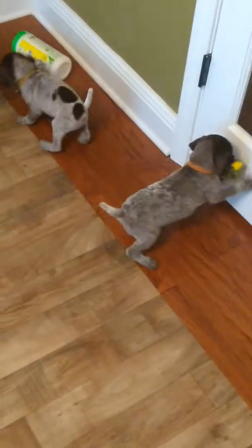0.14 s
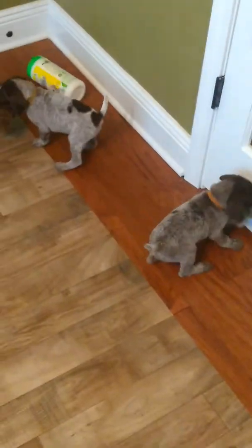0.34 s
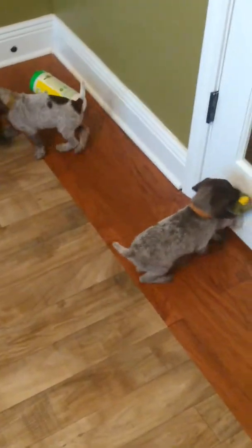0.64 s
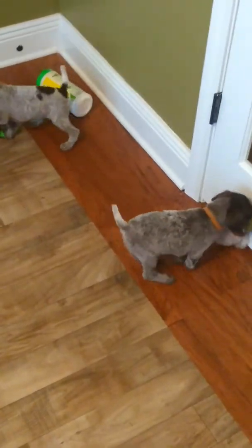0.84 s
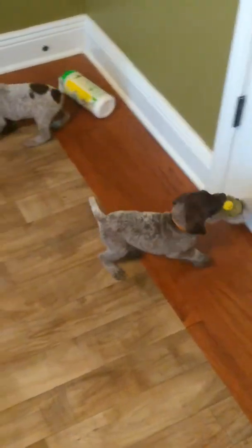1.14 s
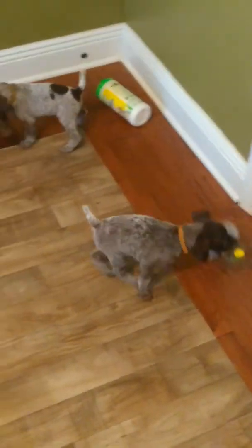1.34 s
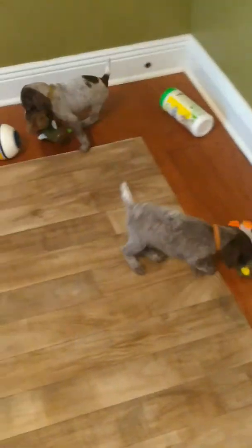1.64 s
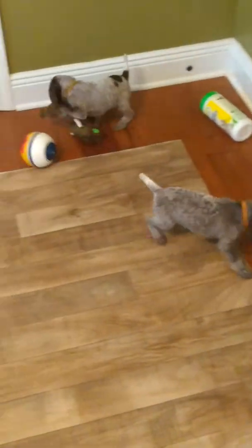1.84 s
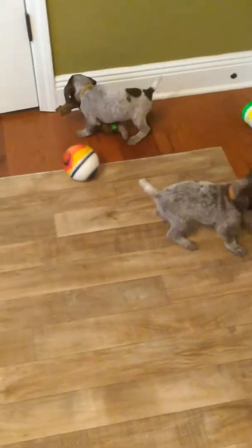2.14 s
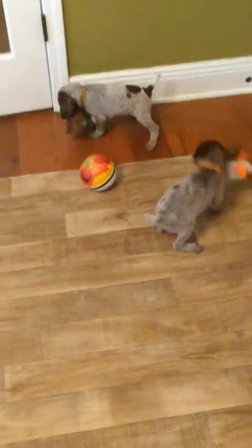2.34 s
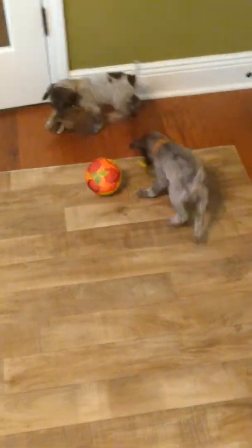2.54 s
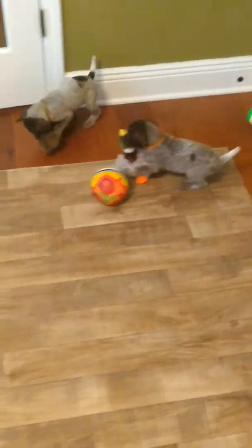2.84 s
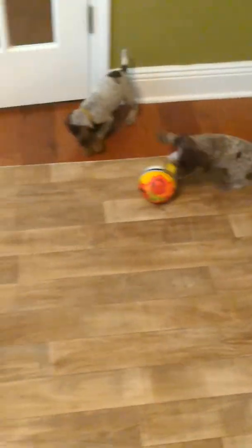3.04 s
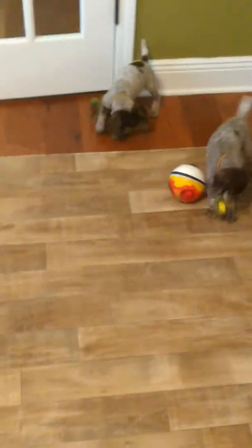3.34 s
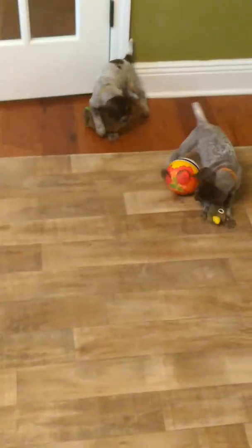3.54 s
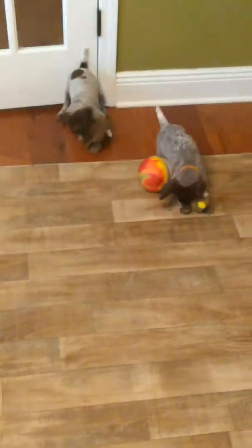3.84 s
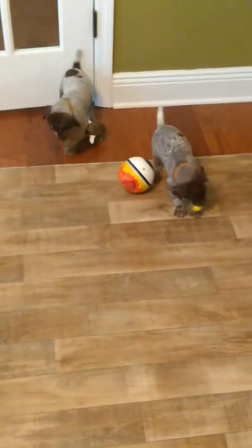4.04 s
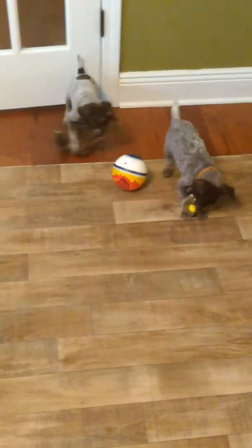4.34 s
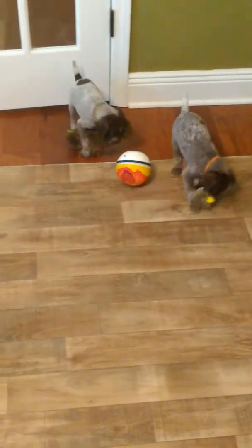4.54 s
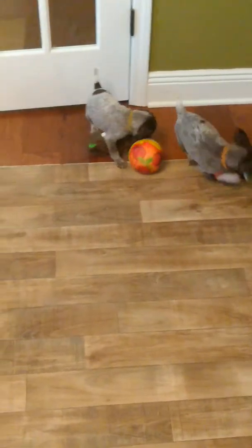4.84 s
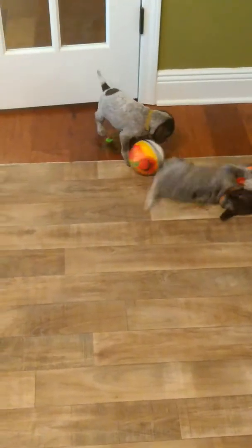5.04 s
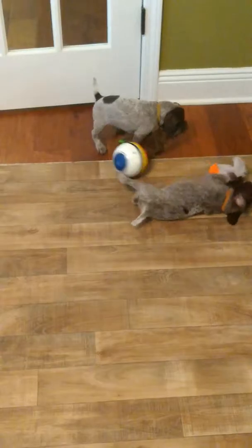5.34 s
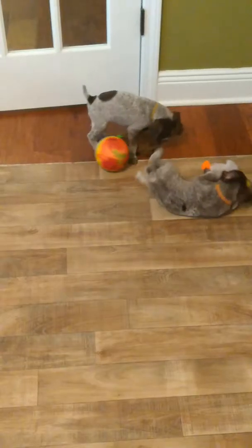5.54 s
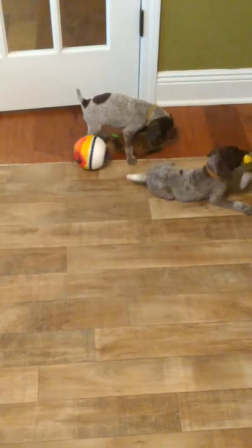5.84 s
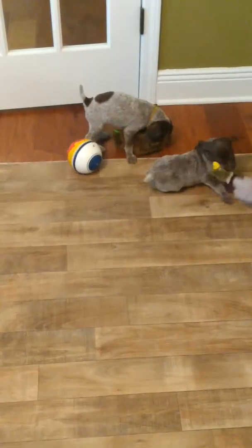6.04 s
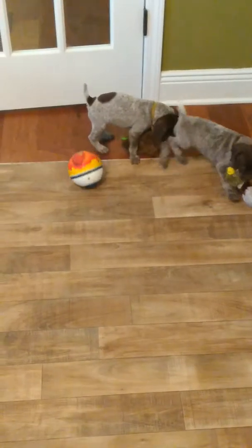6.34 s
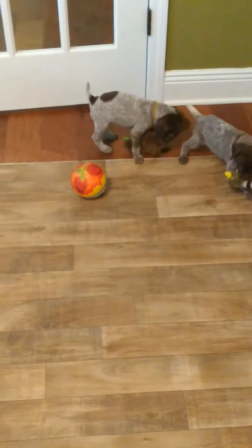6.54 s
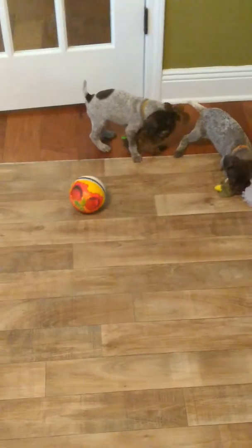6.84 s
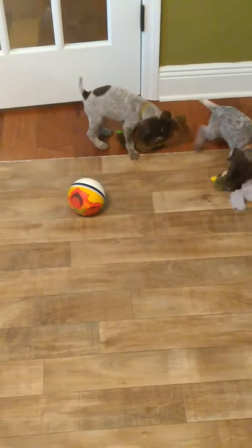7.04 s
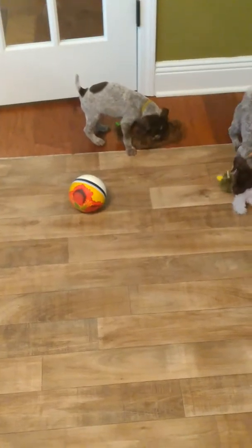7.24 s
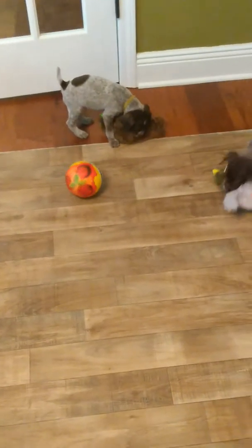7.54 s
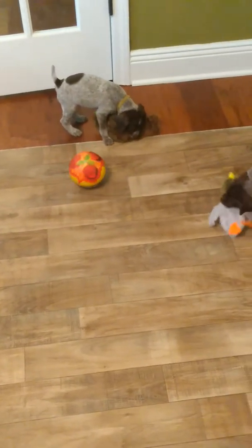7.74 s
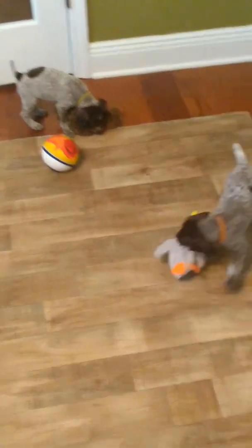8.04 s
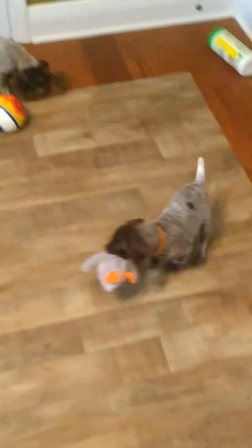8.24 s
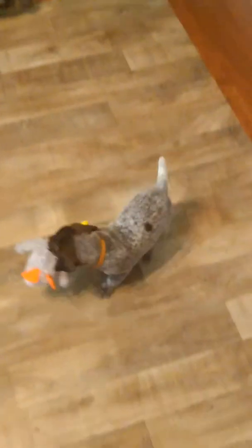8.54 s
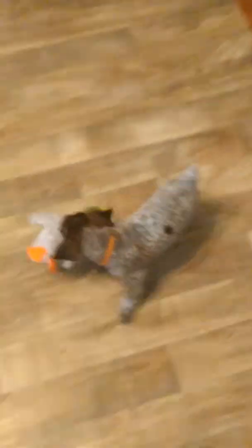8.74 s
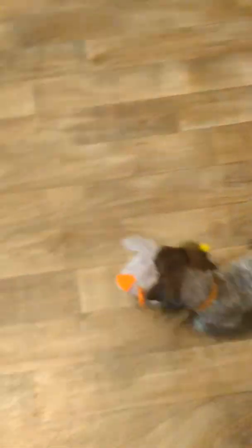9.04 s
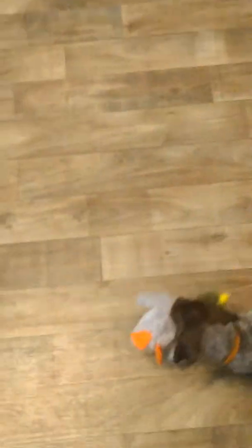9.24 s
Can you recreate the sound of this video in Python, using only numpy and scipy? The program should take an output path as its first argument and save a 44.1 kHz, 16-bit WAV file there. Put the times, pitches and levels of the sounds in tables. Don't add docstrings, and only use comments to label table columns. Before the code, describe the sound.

Over a constant low hum of ventilation, small claws tick, clack and drag on hard boards while padded feet thump unevenly. A crisp snap sounds near the microphone at the start, scrambling thickens, and a loud low body knock lands just past halfway. Afterwards the puppies patter more sparsely, with occasional scrapes and light rustles. The bare indoor room adds a short echo to each contact, heard in wide handheld stereo.

```python
import sys
import numpy as np
from scipy import signal
from scipy.fft import rfft, irfft, next_fast_len
from scipy.io import wavfile

SR = 44100
rng = np.random.default_rng(int(sys.argv[2]) if len(sys.argv) > 2 else 0)


def voltage_ratio(decibels):
    exponent = np.asarray(decibels, float) / 20
    return 10 ** exponent


def int16_out(signal):
    q = np.round(np.clip(np.atleast_2d(signal).T, -1, 1) * 32767)
    wavfile.write(sys.argv[1], SR, q.astype(np.int16))


N = 414143
PLACES = 3


def at_hz(points, hz):
    table_hz, value = np.transpose(points)
    return np.interp(np.log(np.maximum(hz, 1)), np.log(table_hz), value)


def rms_one(x):
    return x / np.sqrt(np.mean(x ** 2) + 1e-20)


def band(x, low_hz, high_hz):
    return signal.sosfilt(signal.butter(2, [low_hz, high_hz], "band", fs=SR, output="sos"), x)


def drift(rate_hz):
    r = np.exp(-2 * np.pi * rate_hz / SR)
    wander = signal.lfilter([1], [1, -2 * r, r * r], rng.standard_normal(N + SR))
    return rms_one(wander[SR:])


def strikes(rows, cycles, tilt_hz, rise_s, rough):
    out = np.zeros((2, PLACES, N + SR))
    chance = rng.standard_normal((len(rows), 4096))
    t = np.arange(4096) / SR
    cycles = np.broadcast_to(cycles, len(rows))
    rough = np.broadcast_to(rough, len(rows))
    for k, (start_s, level_db, pitch_hz, slap_db, contact_s, echo_db) in enumerate(rows):
        push = 8 * pitch_hz * t * np.exp(1 - 8 * pitch_hz * t)
        decay = np.exp(-t / max(contact_s / 1.87, 1e-4))
        rub = chance[k] * decay * (1 - np.exp(-t / rise_s))
        force = push + rough[k] * rub
        r = np.exp(-np.pi * pitch_hz / (cycles[k] * SR))
        w = 2 * np.pi * pitch_hz / SR
        resonance = [0.99, 0.0042, -0.983, 1, -2 * r * np.cos(w), r * r]
        ring = signal.sosfilt([resonance] * 2, force)
        slap = band(force, 0.29 * pitch_hz, tilt_hz)
        slap = band(slap, 0.69 * pitch_hz, min(1.9 * tilt_hz, .45 * SR))
        blow = ring / np.max(np.abs(ring)) + voltage_ratio(slap_db) * slap / np.max(np.abs(slap))
        at = round(start_s * SR)
        out[:, k % PLACES, at:at + len(t)] += voltage_ratio([[level_db], [level_db + echo_db]]) * blow
    return out[..., :N]


# start_s [s], level_db [dB], pitch_hz [Hz], slap_db [dB]
WALL_THUMPS = [(0.199, -41, 350, 14), (.388, -49, 441, -20), (.241, -44.5, 480, 10), (0.412, -32, 652, -29),
               (.641, -39.5, 580, -23), (.748, -36.5, 524, -12), (1.405, -43.5, 584, 9),
               (1.623, -39, 590, -8), (1.708, -40, 560, -2), (1.844, -37.5, 490, -2), (2.098, -33, 590, -2),
               (2.317, -33, 607, -3.5), (2.32, -33.5, 380, -9), (2.579, -31.5, 496, -10),
               (2.953, -30.5, 543, 5), (3.186, -41, 684, -17.5), (3.553, -43, 590, 3),
               (3.558, -28.5, 440, -9), (4.882, -35.5, 554, -4), (5.152, -24, 424, -2),
               (5.1545, -17, 374, -26)]
# start_s [s], level_db [dB], pitch_hz [Hz], slap_db [dB]
OPEN_THUMPS = [(1.098, -33, 450, 1.5), (1.117, -38, 378, -0.5), (1.946, -31, 504, -6), (2.503, -32, 400, 3),
               (2.768, -41, 430, -22), (2.781, -38.5, 412, 4), (2.805, -31, 474, -1), (3.437, -35, 320, 2),
               (3.833, -38, 240, -3), (4.449, -52, 258, 11), (4.78, -45, 250, -16),
               (5.023, -32.5, 520, -19), (5.08, -38, 500, -8), (5.198, -32, 435, -22),
               (6.031, -31.5, 376, -12), (6.363, -45, 490, -10), (6.432, -44, 430, -15),
               (6.472, -31.5, 460, -2), (6.49, -34, 490, -18), (7.192, -38.5, 406, -14),
               (7.509, -38, 368, 4.5), (7.605, -29.5, 382, -27), (7.835, -43, 263, -20),
               (7.932, -41.5, 262, 2.5), (8.002, -37, 310, 2.5), (8.189, -37, 460, -19),
               (8.281, -33.5, 258, -21), (8.402, -29, 640, -4.5), (8.651, -38, 370, -22),
               (8.764, -30, 420, -1.5), (8.974, -41.5, 385, -11), (9.028, -45.5, 350, 12),
               (9.3141, -28, 344, -21)]
# start_s [s], level_db [dB], pitch_hz [Hz], slap_db [dB]
NEAR_TAPS = [
    (.279, -39, 463, 10),
    (.4095, -29, 655, -17),
    (5.1555, -13, 444, -9),
    (6.229, -32.5, 487, -5),
]
# start_s [s], level_db [dB], pitch_hz [Hz]
BOOMS = [
    (2.321, -41, 165),
    (2.5, -44.5, 163),
    (2.809, -44.5, 173),
    (3.429, -50, 165),
    (3.83, -48, 96),
    (3.893, -42.5, 87),
    (5.156, -42, 142),
]


def thumps():
    kinds = [(WALL_THUMPS, 0.0069, 2.5), (OPEN_THUMPS, 0.0077, 0), (NEAR_TAPS, 0.006, -14)]   # contact_s, echo_db
    rows = []
    for table, contact_s, echo_db in kinds:
        for start_s, *blow in table:
            rows.append((start_s - .0015, *blow, contact_s, echo_db))
    rows.sort()
    softness = np.array([voltage_ratio(-.8 * (level_db + 33.0)) for _, level_db, *_ in rows])
    pads = strikes(rows, cycles=2.3, tilt_hz=1700, rise_s=0.00015, rough=1.1 * softness)
    joist_rows = [(*row, -30, .02, -6.0) for row in BOOMS]
    joists = strikes(joist_rows, cycles=4.7, tilt_hz=300, rise_s=0.0027, rough=0.42)
    return voltage_ratio(-1.0) * pads + voltage_ratio(7.5) * joists


# start_s [s], level_db [dB], pitch_hz [Hz], slap_db [dB]
FLAT_CLAWS = [(.2401, -29.5, 2660, 3), (1.0929, -23.5, 1800, -12), (1.2989, -34.5, 2500, 8.5),
              (1.3911, -29, 3050, 3), (1.446, -41, 3120, 11), (1.8365, -35, 2770, 9),
              (2.5761, -40.5, 2800, 20.5), (2.803, -31, 1910, -2), (2.8176, -27.5, 2400, 2),
              (2.9332, -27.5, 2980, -2), (2.9372, -37, 3020, 1), (2.96, -28, 2500, 3),
              (2.981, -37.5, 2950, -11), (3.0004, -28, 2060, -3), (3.41, -42.5, 3100, 18),
              (3.4155, -31, 2880, 6), (4.88, -36, 3150, 8), (4.8835, -31, 1750, 3),
              (5.021, -35.5, 2900, 12), (5.7935, -35, 3000, 5.5), (6.0286, -41.5, 3180, 19.5),
              (6.4735, -28, 2860, 5), (6.4824, -23.5, 2860, 0.5), (7.139, -30, 2520, -9),
              (7.506, -37.5, 2610, 7), (8.3085, -44.5, 2300, 19), (8.433, -45, 3000, 20),
              (8.44, -37, 3250, 19.5), (8.467, -41, 3500, 16), (8.6852, -40, 2980, -5),
              (9.2224, -33.5, 3300, 0.5)]
# start_s [s], level_db [dB], pitch_hz [Hz]
CLAW_POINTS = [(.173, -39, 3330), (1.6824, -42, 3330), (2.1151, -35, 3900), (2.631, -36.5, 4300),
               (3.582, -40.5, 4270), (3.755, -45.5, 3460), (4.5903, -50, 4470), (4.629, -45, 4400),
               (5.775, -38, 3100), (7.4425, -46.5, 4180), (7.7347, -39, 3500), (7.843, -45, 3300),
               (7.921, -42.5, 4460), (8.065, -31.5, 3100), (8.0676, -33, 3570), (8.071, -32.5, 5070),
               (8.9522, -39.5, 3600), (8.977, -43, 4600), (9.002, -35, 3500), (9.1276, -36, 3800)]
# start_s [s], level_db [dB], pitch_hz [Hz]
SKIDS = [(0.409, -47, 2830), (0.6153, -52, 3110), (0.7952, -41, 2930), (1.2082, -39.5, 2760),
         (1.352, -35.5, 2970), (2.3012, -41, 5800), (2.318, -47, 3160), (2.402, -47, 3500),
         (2.5026, -41, 3240), (2.7801, -45, 3040), (3.188, -55.5, 3220), (3.2248, -44, 3470),
         (3.8741, -42, 3280), (5.118, -34, 5200), (7.605, -36.5, 4900), (7.9813, -39, 3840),
         (8.2857, -44, 3380), (8.3993, -38, 5590), (8.91, -48, 2790), (8.931, -47, 2920),
         (0.961, -44, 2570), (1.59, -36, 2860), (2.25, -38.5, 2850), (3.261, -39, 3230),
         (4.116, -38.5, 3900), (4.125, -41, 2820), (5.217, -39, 2940), (8.964, -36.5, 5300),
         (8.99, -47, 5300), (9.021, -39, 5300), (9.134, -31.5, 3800), (9.141, -45, 3600), (1.12, -50, 5300),
         (7.4438, -44, 5100), (3.599, -41.5, 3900)]
# start_s [s], level_db [dB]
TOY_KNOCKS = [
    (0.6427, -45.5),
    (0.7519, -46),
    (1.9445, -42.5),
    (2.0971, -47),
    (2.318, -43),
    (4.451, -58),
    (5.153, -45),
    (7.608, -46),
    (8.398, -52),
    (8.7635, -46),
]


def claws():
    toy_hz = 1390
    hits = FLAT_CLAWS + [(*row, toy_hz, 18.5) for row in TOY_KNOCKS] + [(*row, 12) for row in CLAW_POINTS]
    hits = sorted(hits) + [(*row, 7.5) for row in SKIDS]
    cycles = [4.0 * voltage_ratio(-.6 * slap_db) for *_, slap_db in hits]
    rows = [(*hit, .005, -4.5 if hit[2] == toy_hz else -3.5) for hit in hits]   # contact_s, echo_db
    return voltage_ratio(-1.5) * strikes(rows, cycles=cycles, tilt_hz=6600, rise_s=0.00097, rough=0.79)


# start_s [s], level_db [dB]
SNAPS = [
    (0.299, -14),
]
# start_s [s], level_db [dB]
CLOSE_TICKS = [(0.174, -31.5), (0.75, -27), (.856, -29), (.860, -28), (.865, -30), (.871, -36),
               (1.1176, -39), (1.837, -33), (2.5745, -31), (3.4092, -32), (4.1195, -47), (4.5491, -56),
               (4.589, -43), (4.6309, -46), (4.9074, -29), (4.911, -31), (6.027, -33), (6.041, -44),
               (6.23, -57), (6.6034, -31), (7.4864, -55), (7.5068, -43), (7.5742, -36), (7.7325, -52),
               (7.8271, -53), (7.859, -39), (7.9916, -53), (8.0461, -54), (8.3135, -46), (8.4407, -44),
               (8.839, -39), (8.956, -58), (9.2228, -31)]
# start_s [s], level_db [dB]
FAR_TICKS = [(0.239, -38), (.4065, -60), (0.554, -50.5), (1.094, -42), (1.2983, -28), (1.3886, -37),
             (1.585, -43.5), (1.6796, -53), (2.115, -35.5), (2.3, -43.5), (2.934, -41), (3.582, -43),
             (5.0202, -33.5), (5.116, -36), (5.7785, -46), (6.472, -32.5), (7.4185, -55), (7.9214, -48),
             (8.062, -38.5), (8.238, -41.5), (8.3689, -43), (8.438, -28), (8.6038, -46), (8.7624, -46)]


def ticks():
    tips = []
    for table, echo_db in [(SNAPS, -29), (CLOSE_TICKS, -5.5), (FAR_TICKS, 6.5)]:
        tips += [(*row, echo_db) for row in table]
    rows = []
    for start_s, level_db, echo_db in sorted(tips):
        contact_s = 0.0018 * voltage_ratio(0.32 * echo_db)
        rows.append((start_s, level_db, 11500, 3.0, contact_s, echo_db))
    return voltage_ratio(1.5) * strikes(rows, cycles=0.55, tilt_hz=19600, rise_s=0.00054, rough=0.38)


def grains(per_s, size_db, low_hz, high_hz):
    born = rng.random((PLACES, N)) < per_s * voltage_ratio(4.0 * drift(15)) / SR
    sizes = voltage_ratio(size_db * np.minimum(rng.exponential(1, (PLACES, N)), 4))
    signs = rng.choice([-1, 1], N)
    return rms_one(band(born * sizes * signs + 1e-18, low_hz, high_hz))


def strokes(sudden, swelling=()):
    t = np.arange(0, N, 64) / SR
    level_db = -106
    rows = [(*row, 0.038) for row in sudden] + [(*row, row[-1]) for row in swelling]
    for peak_s, peak_db, fade_s, rise_s in rows:
        away = np.maximum((t - peak_s) / fade_s, (peak_s - t) / rise_s)
        level_db = np.maximum(level_db, peak_db - 23.5 * away)
    return np.interp(np.arange(N) / SR, t, level_db)


# time_s [s], level_db [dB]
BUSTLE = [(0, -44), (.52, -64.5), (.9, -54.5), (1.5, -49.5), (1.8, -47), (3.3, -46), (4.4, -53.5),
          (4.9, -53), (5.2, -42), (5.4, -54), (5.9, -58), (6.5, -47), (6.9, -58), (7.7, -53), (8.05, -54),
          (8.6, -51), (8.92, -47.5), (9.39, -54)]
# start_s [s], level_db [dB], fade_s [s]
DRAGS = [(0, -41.5, 0.14), (.18, -40, 0.32), (1.12, -37.5, 0.077), (1.31, -36.5, 0.33), (3.2, -41.5, .4),
         (3.27, -42.5, 2.7), (4.13, -41.5, 0.42), (4.89, -36, 0.36), (5.035, -38, 0.71), (5.19, -52, 0.36),
         (5.78, -46, 0.41), (6.04, -56, 17), (6.5, -35.5, 0.31), (7.14, -34.5, 0.14), (8.08, -38.5, 0.45),
         (8.45, -28.5, 0.068), (8.97, -45, 2.7)]
# peak_s [s], level_db [dB], fade_s [s]
SLIDES = [(0.809, -44, 0.44), (1.78, -36, 0.45), (2.3, -52, 1.5), (2.7, -44, 4.9), (2.96, -52, 0.15),
          (3.7, -46.5, 2.7), (4.649, -47.5, 0.67), (4.84, -42, 0.21), (7.13, -38.5, 0.094),
          (7.5, -41, 0.24), (7.95, -49, 1.5), (8.36, -50, .6), (8.65, -46, 1.2)]
# start_s [s], level_db [dB], fade_s [s]
FLICKS = [(.185, -55, 0.4), (.75, -49.5, 0.44), (.86, -45.5, 0.14), (1.1, -57.5, 1.5), (1.33, -45, .3),
          (1.59, -60, .2), (2.12, -52.5, 2.1), (2.43, -44, 0.49), (2.59, -45.5, 0.36), (2.8, -46.5, 0.7),
          (3.43, -42, 0.13), (4.13, -37.5, 0.021), (4.16, -50.5, 0.43), (4.89, -46.5, 0.55),
          (5.035, -48, 1.26), (5.8, -52.5, 0.67), (6.04, -55.5, 0.75), (6.505, -39.5, 0.1),
          (6.61, -43.5, 0.18), (8.45, -52, 1.3), (8.97, -43.5, 0.25)]
# peak_s [s], level_db [dB], fade_s [s]
BRUSHES = [(.05, -39, 0.11), (.29, -42.5, 0.12), (.64, -51, 0.16), (1.41, -39.5, 0.12), (1.74, -43.5, 0.48),
           (3.29, -42, 0.18), (3.61, -44.5, 0.12), (3.75, -52, .8), (3.893, -39, 0.13), (4.71, -51, 0.45),
           (4.84, -41.5, .14), (6.33, -54.5, .2), (7.16, -41.5, 0.14), (7.59, -46.5, 0.1),
           (8.03, -53.5, 0.51), (8.42, -53, 0.66), (9.13, -45, 0.34), (9.39, -45, 0.41)]


def scuffle():
    landings = WALL_THUMPS + OPEN_THUMPS
    resettle_db = strokes([(start_s + .03, level_db - 10, 0.084) for start_s, level_db, *_ in landings])
    time_s, level_db = np.transpose(BUSTLE)
    bustle_db = np.interp(np.arange(N) / SR, time_s, level_db)
    shuffle = voltage_ratio(np.maximum(bustle_db, resettle_db) - 12.5) * grains(90, 2.0, 186, 1016)
    scrape = voltage_ratio(strokes(DRAGS, SLIDES) - 13.5) * grains(260, 2.7, 1920, 6140)
    rustle = voltage_ratio(strokes(FLICKS, BRUSHES) - 7.5) * grains(900, 3.6, 3500, 16900)
    return shuffle + voltage_ratio([[[2.0]], [[-1.5]]]) * scrape + voltage_ratio([[[1.5]], [[-1.5]]]) * rustle


# pitch_hz [Hz], correlation [0-1]
PORTS_ALIKE = [(50, 1), (300, 0.93), (700, 0.52), (1200, 0.0071), (3000, 0.15), (16000, .01)]
# pitch_hz [Hz], level_db [dB]
FAR_PORT = [(50, 2.5), (150, .5), (350, -2), (1600, -4.5), (4000, -4.5), (7200, -3), (9000, -9),
            (12000, -9), (15000, -5)]


def two_ports(size):
    hz = np.fft.rfftfreq(size, 1 / SR)
    near, other = rfft(rng.standard_normal((2, size)))
    alike = np.clip(at_hz(PORTS_ALIKE, hz), 0, 1)
    far = voltage_ratio(at_hz(FAR_PORT, hz)) * (alike * near + np.sqrt(1 - alike ** 2) * other)
    return hz, np.array([near, far])


# pitch_hz [Hz], level_db [dB]
ECHO_SHARE = [(150, -28.5), (500, -26.5), (3000, -29.5), (8000, -24), (15000, -25.5)]
# pitch_hz [Hz], t60_s [s]
ROOM_T60 = [(150, 0.55), (400, 0.45), (1000, 0.53), (2800, 0.53), (7000, 0.36), (15000, 0.035)]


def room(direct_feed, echo_feed, first_echo_s, direct_lag):
    size = SR
    hz, noise = two_ports(size)
    t = np.arange(size) / SR
    tail = np.zeros((2, size))
    for centre_hz in 60 * 2 ** np.arange(9):
        share = np.clip(1 - np.abs(np.log2(np.maximum(hz, 1) / centre_hz)), 0, 1)
        decay_db = at_hz(ECHO_SHARE, centre_hz) - 60 * t / at_hz(ROOM_T60, centre_hz)
        tail += irfft(noise * share, size) * voltage_ratio(decay_db)
    tail *= 1 - np.exp(-(t / first_echo_s) ** 2)
    tail *= 1 + 1.24 * np.exp(-t / 0.0047)
    shade = signal.firwin2(65, hz[::490], voltage_ratio(at_hz(FAR_PORT, hz[::490])), fs=SR)
    far = np.convolve(np.pad(direct_feed, (direct_lag, 0)), shade)[32:N + 32]
    echoes = signal.fftconvolve(echo_feed[None], tail, axes=1)[:, :N]
    return np.array([direct_feed, far]) + echoes


# pitch_hz [Hz], level_db [dB per Hz]
AIR = [(20, -108), (50, -82), (130, -72.5), (300, -77.5), (800, -93), (2000, -90.5), (5000, -111),
       (9000, -117), (16000, -113)]
# pitch_hz [Hz], width_hz [Hz], level_db [dB]
HUM = [
    (54.2, 3, -62.5),
    (101.1, 3.8, -50),
    (115.2, 8.7, -52),
    (258, 12.7, -53),
    (841, 3.2, -70),
]


def ventilation():
    hz, noise = two_ports(N)
    power = voltage_ratio(at_hz(AIR, hz)) ** 2
    for pitch_hz, width_hz, level_db in HUM:
        off_centre = 2 * (hz - pitch_hz) / width_hz
        power = power + voltage_ratio(level_db) ** 2 / width_hz / (1 + off_centre ** 2) ** 2
    return irfft(noise * np.sqrt(power * SR / 2), N) * voltage_ratio(.8 * drift(3))


def scene():
    direct, echo = thumps() + claws() + ticks() + scuffle()
    far_lags = [3, 8, 13]
    ports = 0
    for direct_feed, echo_feed, lag in zip(direct, echo, far_lags):
        ports = ports + room(direct_feed, echo_feed, first_echo_s=.003, direct_lag=lag)
    return ports + ventilation()


def roll_off(x):
    return signal.sosfilt(signal.butter(12, 16540, fs=SR, output="sos"), x)


# pitch_hz [Hz], level_db [dB]
PORT_COLOUR = [(300, -1), (1200, -3), (4500, -1.5), (7000, -10.5), (8800, -2), (13000, -5), (15800, -9)]
# pitch_hz [Hz], lag [samples]
PORT_LAG = [(2200, 20.05), (4400, 20), (9000, 19.55), (13400, 19.7)]
# pitch_hz [Hz], level_db [dB]
NEAR_INTO_LEFT = [(50, -5), (150, -5.5), (400, 0.5), (1000, -1.5), (3000, -0.5), (7000, -10), (8800, -4.5),
                  (10000, -5.5), (10800, -12), (16000, 3)]
# pitch_hz [Hz], level_db [dB]
FAR_INTO_RIGHT = [(50, -2.5), (150, -1.5), (400, -7.5), (2200, 3.5), (4400, -1.5), (7000, 2), (10000, -12),
                  (16000, 17)]
HISS_DB = [
    [-76],
    [-75],
]


def record(dry):
    size = next_fast_len(N + 512)
    hz = np.fft.rfftfreq(size, 1 / SR)
    near, far = rfft(dry, size) * voltage_ratio(at_hz(PORT_COLOUR, hz))
    late = np.exp(-2j * np.pi * hz * at_hz(PORT_LAG, hz) / SR)
    left = far - voltage_ratio(at_hz(NEAR_INTO_LEFT, hz)) * late * near
    right = near - voltage_ratio(at_hz(FAR_INTO_RIGHT, hz)) * late * far
    top = np.where(hz < 15790, 1, voltage_ratio(-30)) * (hz < 16540)
    sides = irfft(np.array([left, right]) * top, size)[:, :N]
    rumble = voltage_ratio([[-69], [-75]]) * rms_one(band(rng.standard_normal((2, N)), 33, 90.5))
    hiss = voltage_ratio(HISS_DB) * rms_one(band(rng.standard_normal((2, N)), 3400, 13000))
    dc_offset = [[.00765], [-.0003]]
    return roll_off(sides + rumble + hiss + dc_offset)


dry = scene()
out = record(dry)
int16_out(out)
```